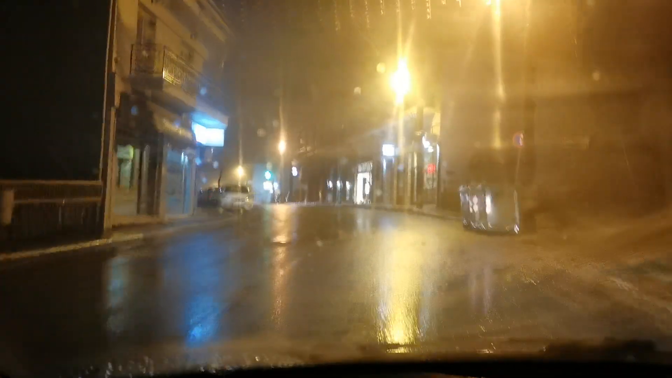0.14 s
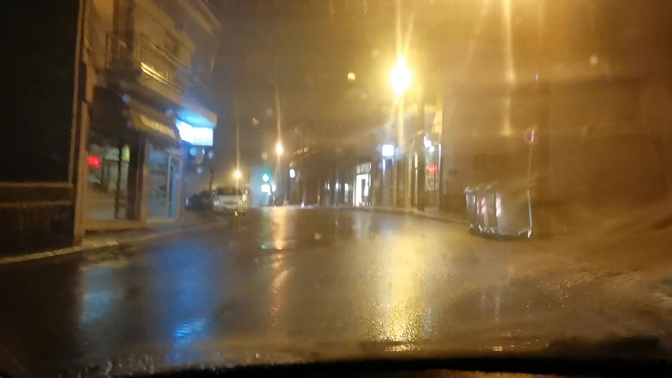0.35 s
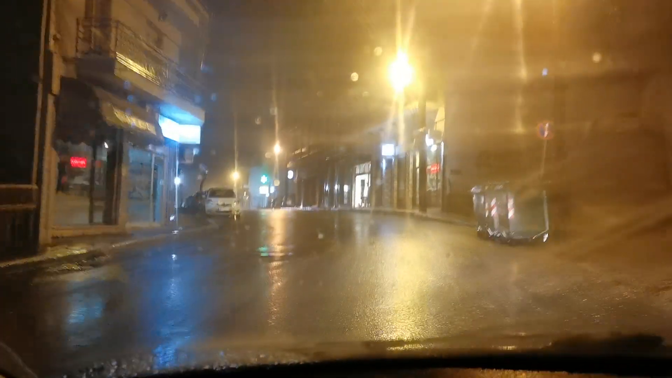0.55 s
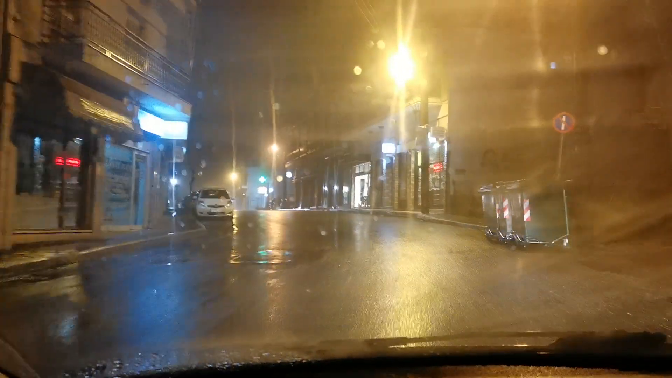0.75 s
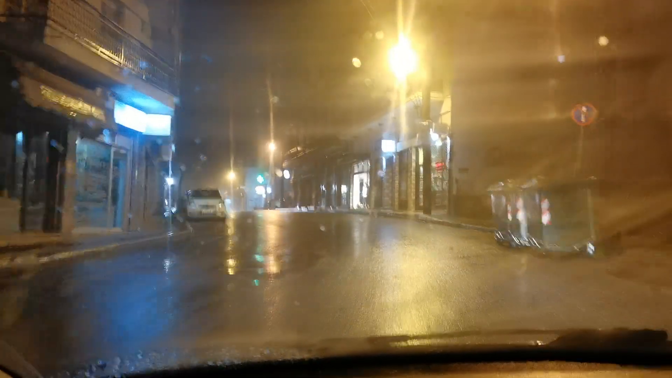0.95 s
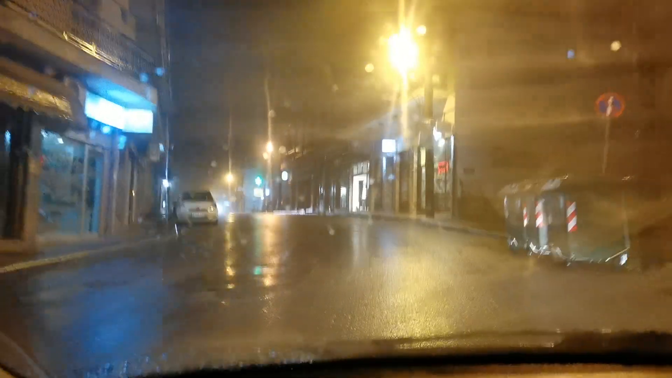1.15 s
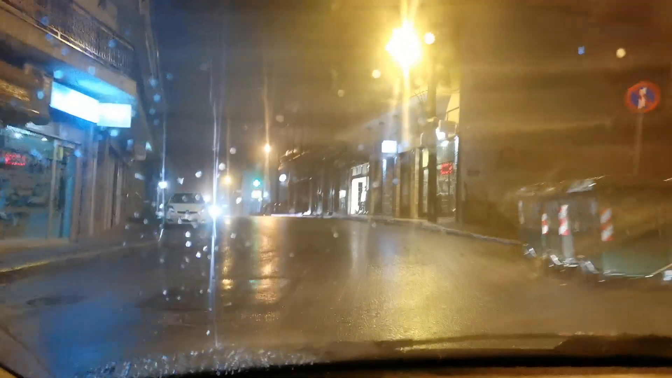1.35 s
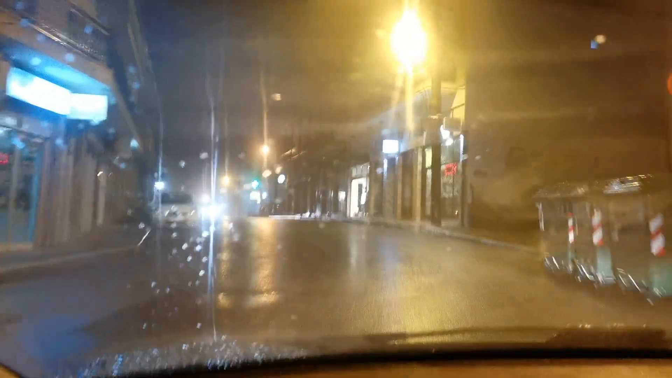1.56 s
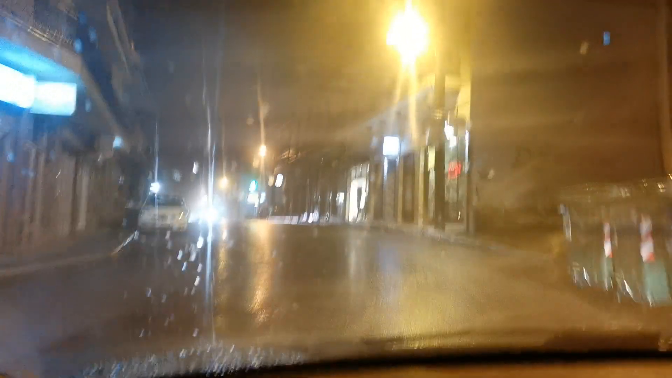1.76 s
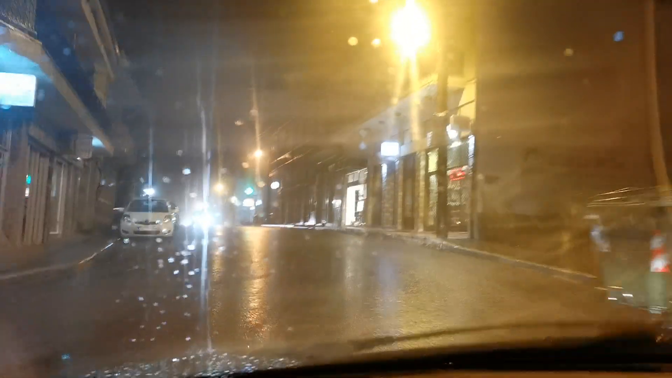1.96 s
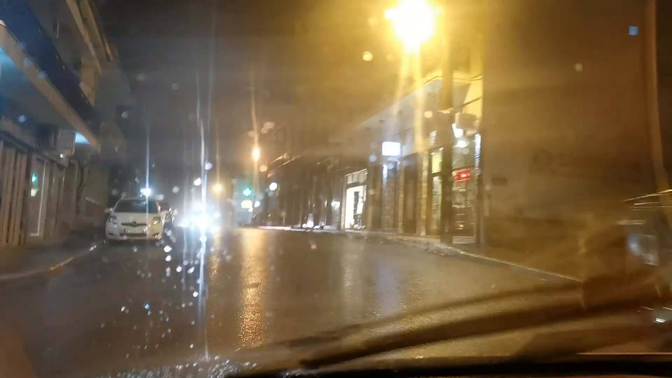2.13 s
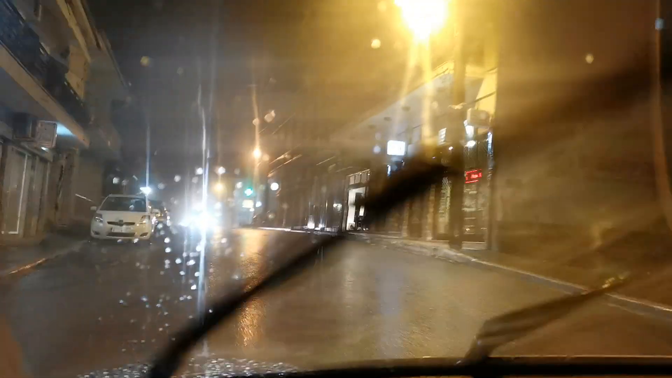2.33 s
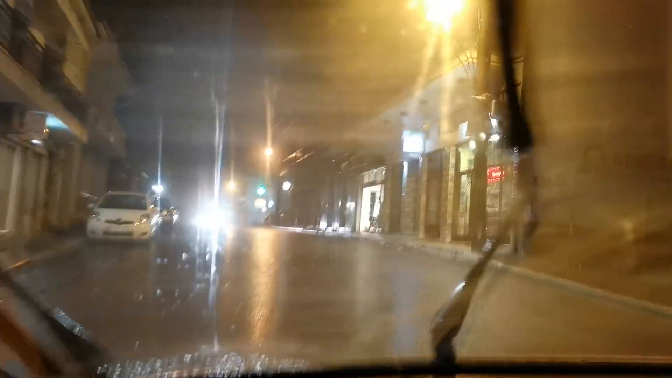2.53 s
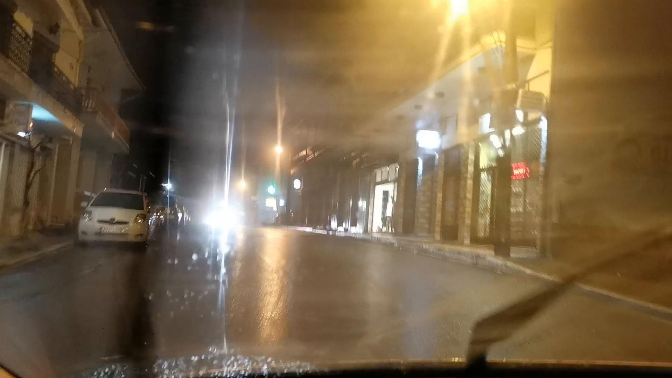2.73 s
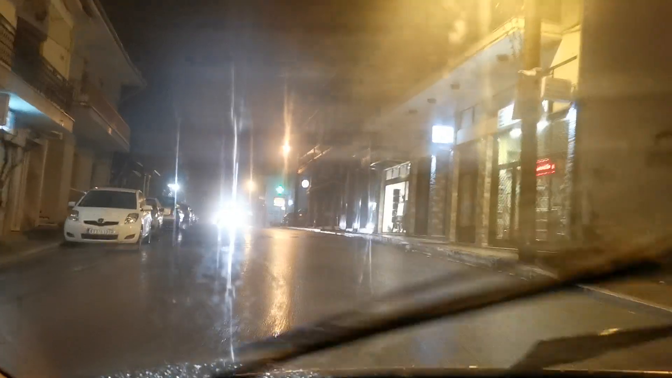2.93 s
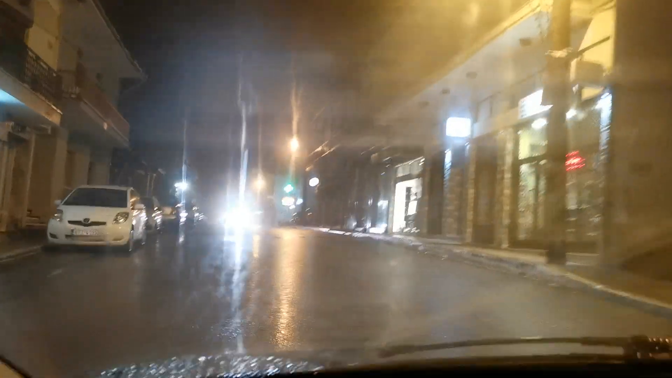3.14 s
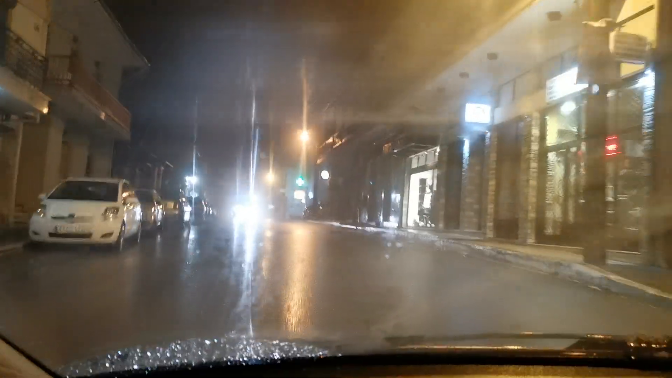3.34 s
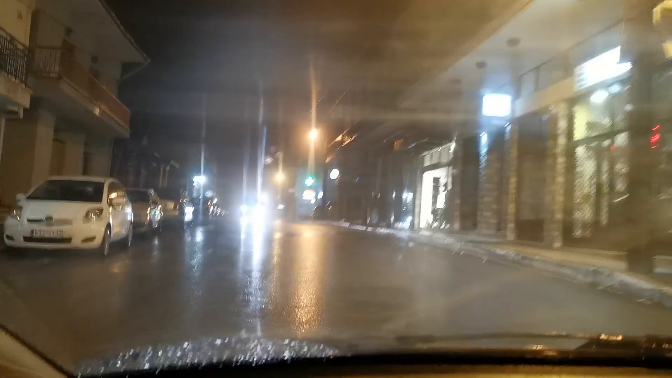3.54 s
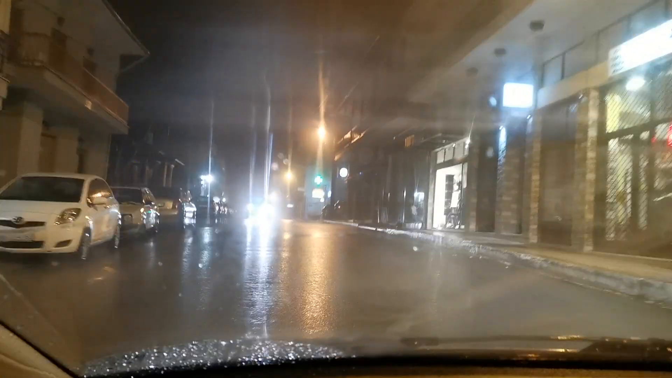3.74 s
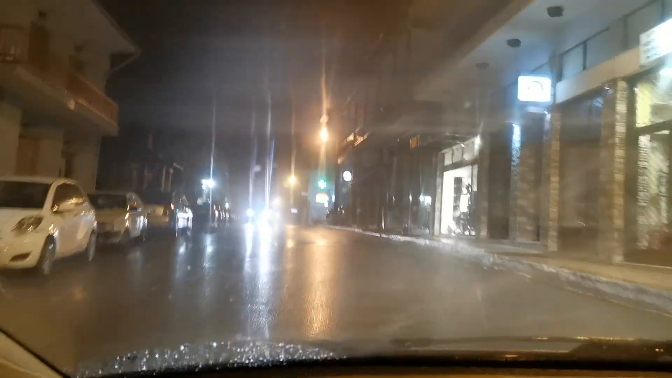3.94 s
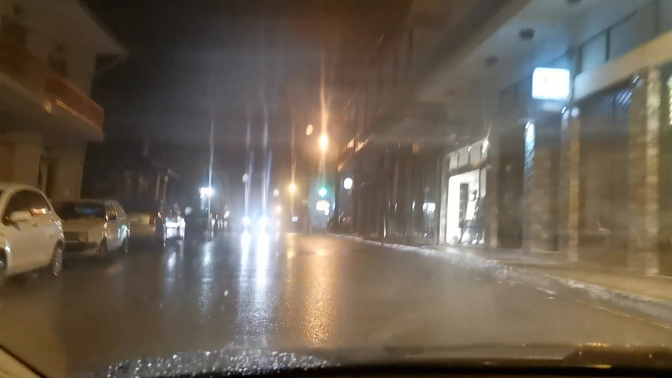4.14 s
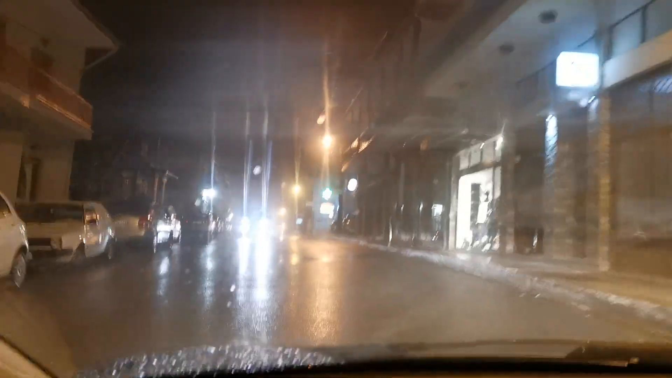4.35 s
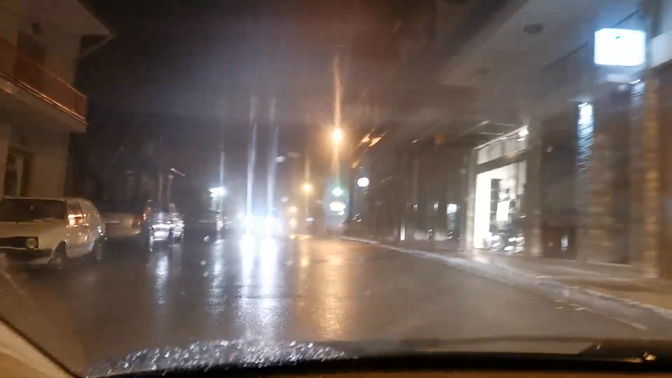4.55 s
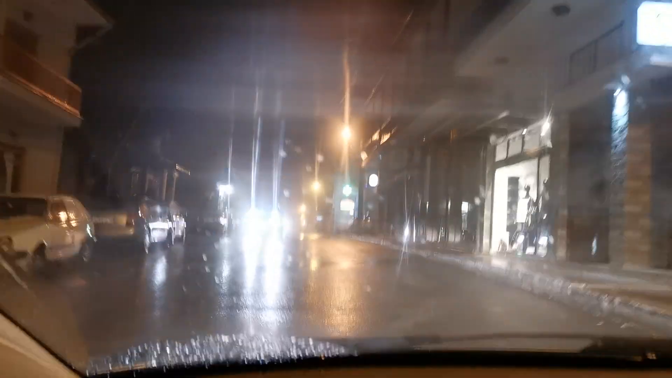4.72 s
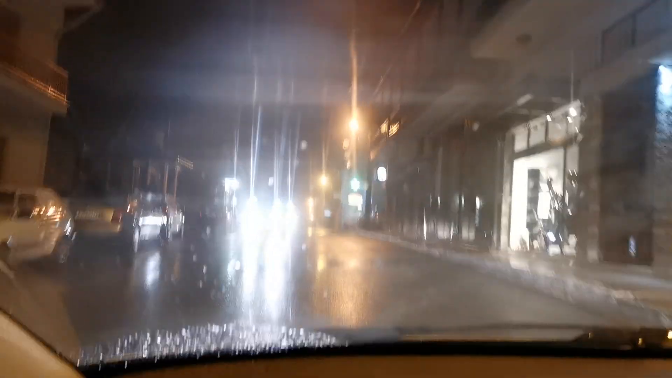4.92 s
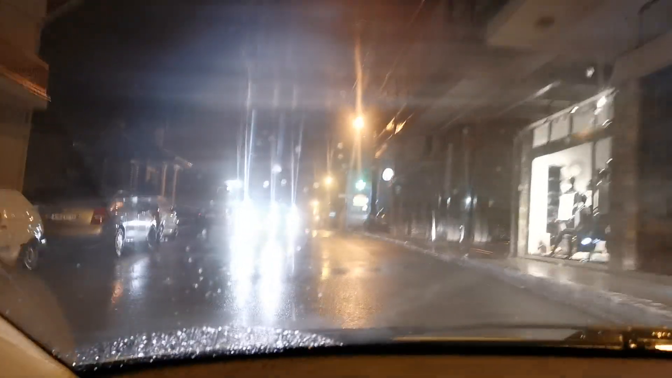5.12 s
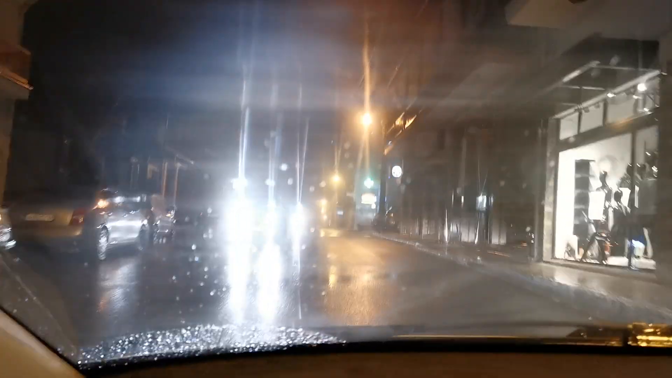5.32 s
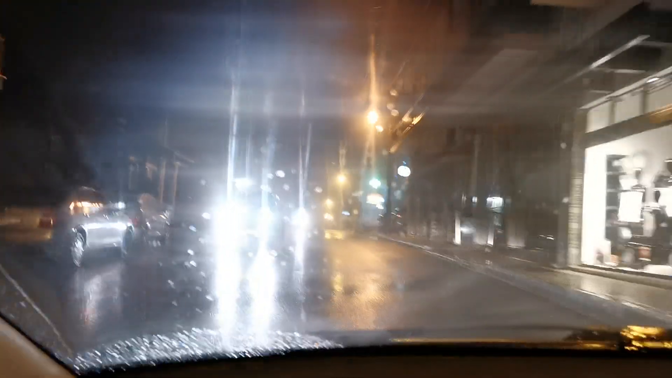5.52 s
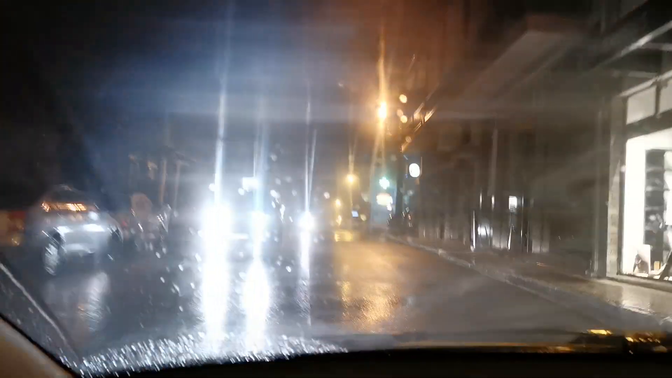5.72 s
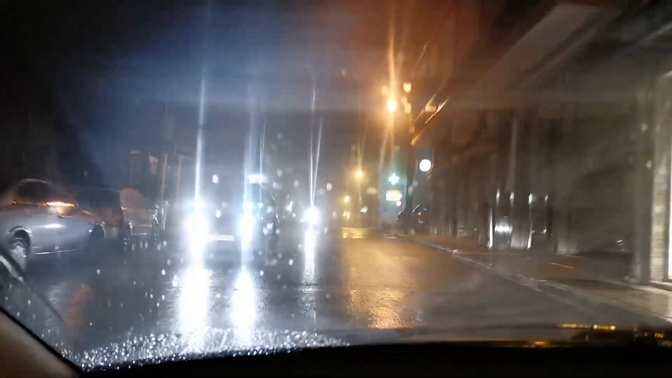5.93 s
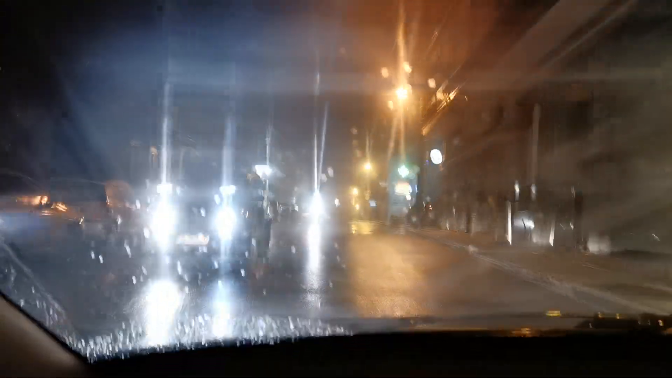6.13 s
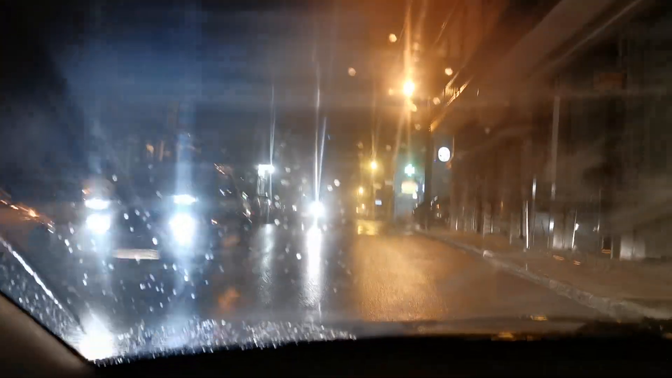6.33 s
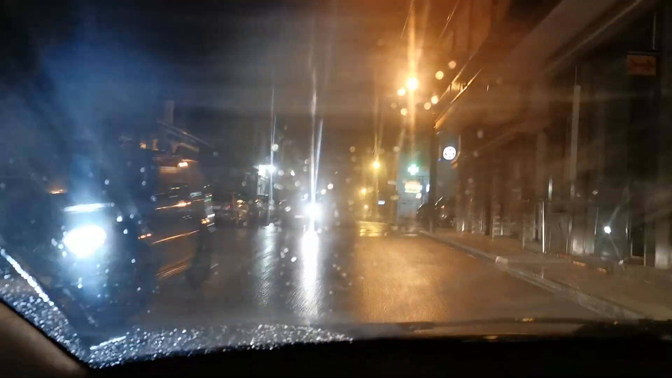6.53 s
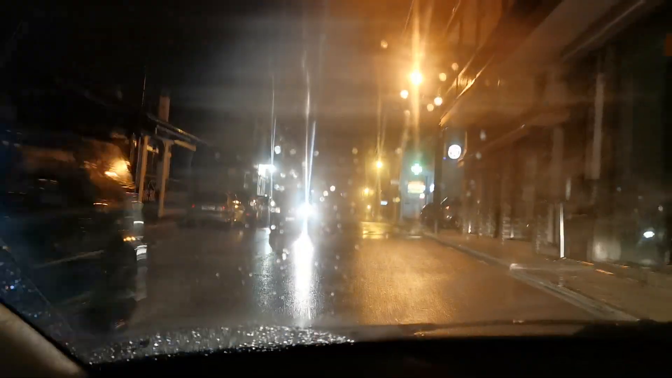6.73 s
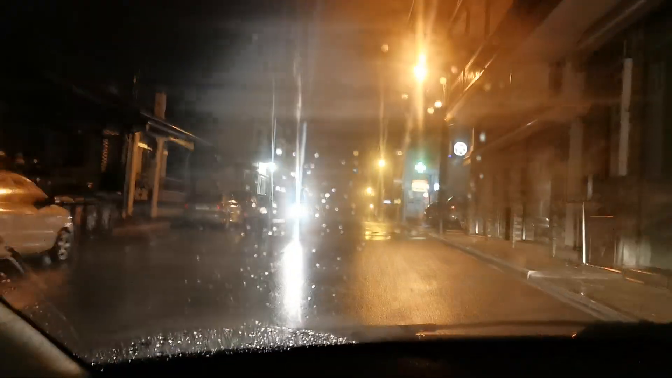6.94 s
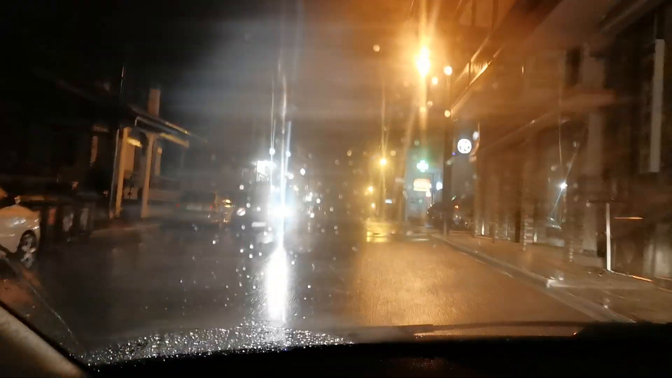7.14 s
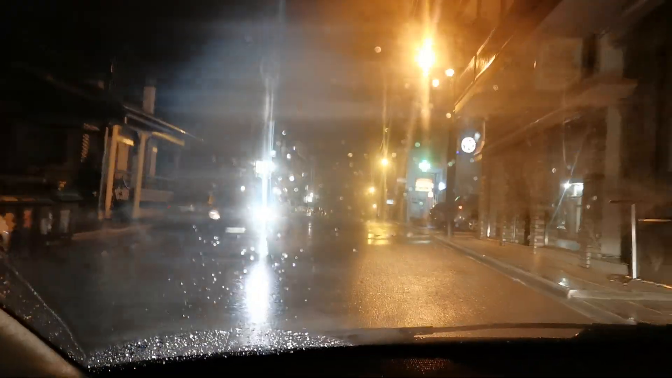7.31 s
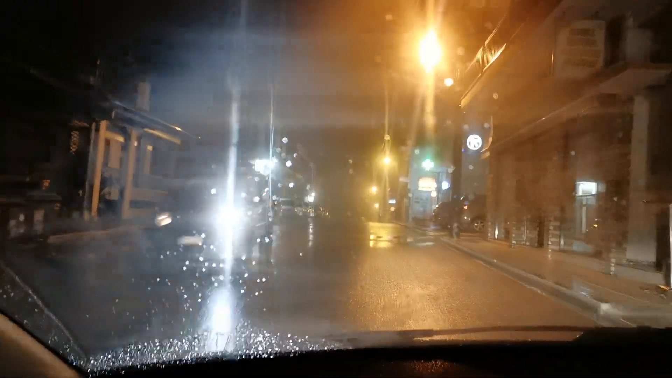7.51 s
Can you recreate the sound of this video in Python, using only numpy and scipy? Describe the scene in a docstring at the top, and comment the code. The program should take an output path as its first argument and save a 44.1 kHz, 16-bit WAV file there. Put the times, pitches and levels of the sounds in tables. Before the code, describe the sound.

Low cabin rumble and engine drone with wet tyre hiss, one harsh rubbery wiper scrape, small plastic clicks, and a splashing car passing near the end.

```python
"""Inside a small car rolling slowly along a wet street at night: the engine drones, then drops to idle.
The road rumbles and booms in the cabin as filtered noise; the engine is a firing tone plus overtones.
Tyres hiss on the water, and an oncoming car sprays past near the end: noise that swells and fades.
The wipers make one sweep: two rubber blades judder loudly up the glass, as stick-slip tones with a
scrape at every slip, then slide back softly and park with a click. A thin squeal comes near the end."""
import sys
import numpy as np
from scipy import signal
from scipy.fft import rfft, irfft
from scipy.io import wavfile
from scipy.ndimage import uniform_filter1d

SR = 44100
rng = np.random.default_rng(int(sys.argv[2]) if len(sys.argv) > 2 else 0)


def materialize(psi):
    """Save the field psi as 16-bit PCM at rate SR to the path in sys.argv[1].

    A 1-D psi becomes a single channel; in a 2-D psi each row is a channel.
    """
    bounded = np.clip(np.atleast_2d(psi).T, -1, 1)
    quanta = np.round(bounded * 32767).astype(np.int16)
    wavfile.write(sys.argv[1], SR, quanta)


N = 338245
TIME = np.arange(N) / SR  # seconds
BINS = np.fft.rfftfreq(N, 1 / SR)  # Hz


def amp(db):
    """Turn decibels into a gain."""
    return 10 ** (np.asarray(db) / 20)


def unit(x):
    """Scale to an rms (average strength) of 1."""
    return x / np.sqrt(np.mean(abs(x) ** 2) + 1e-20)


def read(points, hz):
    """Look up a spectrum's value at hz, on a log-frequency axis."""
    f, value = np.transpose(points)
    return np.interp(np.log(hz + 1), np.log(f + 1), value)


def curves(rows):
    """Join the points of every column of a table with straight lines, sample by sample."""
    s, *columns = np.transpose(rows)
    return [np.interp(TIME, s, column) for column in columns]


def during(rows):
    """A gate with soft edges, open over the time that a table covers."""
    is_open = (TIME > rows[0][0]) & (TIME < rows[-1][0])
    return uniform_filter1d(1. * is_open, size=300)


def swell(s, half_s, db):
    """A smooth rise and fall around time s."""
    return amp(db) * np.exp(-((TIME - s) / half_s) ** 2)


def ramp(s, length):
    """Climb from 0 at time s to 1 after length seconds."""
    return np.clip((TIME - s) / length, 0, 1)


def thud(s, rise_s, db):
    """The level of a quick push that peaks after rise_s and dies away."""
    u = np.maximum(TIME - s, 0) / rise_s
    return amp(db) * u * np.exp(1 - u)


def wander(hz):
    """A slow random curve of rms 1 that varies up to about hz."""
    s = np.arange(0, 8, 1 / 2000)
    f = np.fft.rfftfreq(len(s), s[1])
    slow = irfft(rfft(rng.standard_normal(len(s))) / (1 + (f / hz) ** 4))
    return np.interp(TIME, s, unit(slow))


def colour(x, spectrum):
    """Filter by a spectrum that falls away beyond its last point; white noise keeps its level."""
    fall = np.maximum(BINS / spectrum[-1][0], 1) ** 2
    gain = amp(read(spectrum, BINS)) / fall
    return irfft(rfft(x) * unit(gain), N)


def pair(x, likeness):
    """Mix two unrelated signals into left and right with the given likeness."""
    angle = np.arccos(np.clip(read(likeness, BINS), -1, 1)) / 2
    mid, side = rfft(x) * np.array([np.cos(angle), np.sin(angle)])
    return irfft(np.array([mid + side, mid - side]), N)


# How alike left and right are in the cabin: f/Hz, likeness (1 = the same, 0 = unrelated)
LIKENESS = [(60, 1), (250, .99), (500, 0.98), (1000, 0.96), (2000, 0.71), (3500, 0.52), (6000, -0.026),
            (12000, 0.11)]


def cabin_noise(spectrum, grain_db=0):
    """Noise from all around, reaching the two microphones; grain makes its level spatter."""
    grains = rng.standard_normal((2, N)) * amp(grain_db * wander(400))
    return colour(pair(unit(grains), LIKENESS), spectrum)


def cabin_echo(x, t60):
    """Dense short reflections off glass and trim, different at each microphone; t60 s to fall 60 dB."""
    t = np.arange(SR // 4) / SR
    tail = rng.standard_normal((2, len(t))) * amp(-60 * t / t60) * (t > .001)
    return signal.fftconvolve(x[None], tail / np.linalg.norm(tail[0]), axes=1)[:, :N]


# Road noise before it sways, easing as the car slows: t/s, rumble level/dB, boom level/dB, tread level/dB
ROAD = [(0, -33.5, -44, -43.5), (.45, -35.5, -35, -45), (1.4, -32, -31, -43), (1.65, -34.5, -35.5, -44.5),
        (3.5, -34.5, -39.5, -45), (4.6, -35.5, -37, -41.5), (5.6, -33.5, -36.5, -45), (6.45, -36, -36, -48),
        (7.67, -36.5, -40.5, -49.5)]
# Low swells: dips in the road, and at 2.02 s the wiper linkage starting with a low thump:
# t/s, half length/s, added rumble level/dB, added boom level/dB
LOW_SWELLS = [(0.467, 0.061, 7, -2), (1.81, 0.073, 6.5, 3), (2.02, 0.052, 5, 10.5), (5.978, .08, 4.5, -0.5),
              (6.26, 0.063, 5, 3.5), (7.577, 0.066, 6.5, 3.5)]
# Colours of the body rumble, tyre boom and tread roar: f/Hz, relative level/dB (per Hz)
RUMBLE = [(8, -9), (18, 11.5), (30, 0.5), (41, 13), (50, 5), (70, 0), (88, 1), (105, 0), (160, -54.5)]
BOOM = [(85, -37.5), (112, -6.5), (127, 10), (142, 7), (155, 3), (172, -5), (195, -4), (240, -26.5),
        (330, -47.5)]
TREAD = [(130, -45.5), (220, 8.5), (280, -3), (370, 1.5), (450, -6.5), (560, -3), (720, -8.5),
         (1000, -12.5), (2000, -37.5)]
ROAD_SWELL_DB, ROAD_SWELL_HZ = 1.44, 2.7


def road():
    """Body rumble, tyre boom and tread roar sway with the uneven surface; low swells add to the first two."""
    rumble_db, boom_db, tread_db = curves(ROAD)
    for s, half_s, more_rumble_db, more_boom_db in LOW_SWELLS:
        shape = swell(s, half_s, 0)
        rumble_db = rumble_db + more_rumble_db * shape
        boom_db = boom_db + more_boom_db * shape
    out = np.zeros((2, N))
    for db, tone in [(rumble_db, RUMBLE), (boom_db, BOOM), (tread_db, TREAD)]:
        level = amp(db + ROAD_SWELL_DB * wander(ROAD_SWELL_HZ))
        out += level * cabin_noise(tone)
    return out


# The engine slows gently, then falls to idle as the clutch opens: t/s, firing f/Hz (before it wavers)
FIRING = [(0, 70.2), (1.3, 67.9), (2, 66.2), (2.8, 63.6), (3.5, 62.6), (5.6, 62), (5.77, 61), (6, 53),
          (6.25, 41), (7.35, 29)]
# Engine load: t/s, firing tone level/dB, overtones level/dB (before they waver)
LOAD = [(0, -40, -38.5), (.9, -34, -37.5), (1.8, -35, -37), (3, -32, -38), (5.5, -32.5, -41),
        (5.85, -34, -50.5), (6.2, -38, -58), (6.6, -58, -51), (7.3, -38, -60)]
# How the car body passes on the engine's overtones: f/Hz, level/dB
ENGINE_BODY = [(110, -18), (135, -1), (155, -11), (175, -12), (190, -9), (235, -22), (260, -3.5),
               (282, -20), (310, -22), (355, -14.5), (385, -20.5), (412, -15.5), (460, -33), (560, -26.5)]
# Before the fall to idle the drivetrain shunts, rocking the firing rate
SHUNT_FROM_S, SHUNT_TO_S, SHUNTS_PER_S, SHUNT_DEPTH_HZ = 4.055, 5.69, 3.06, 1.8


def engine():
    """Four firings a cycle make a strong tone; the cycle's multiples slide through body resonances."""
    shunting = (TIME > SHUNT_FROM_S) & (TIME < SHUNT_TO_S)
    rocking = shunting * np.sin(2 * np.pi * SHUNTS_PER_S * (TIME - SHUNT_FROM_S))
    firing_hz = curves(FIRING)[0] - SHUNT_DEPTH_HZ * rocking
    tone_db, overtones_db = curves(LOAD)
    cycle_hz = firing_hz * (1 + .0015 * wander(6)) / 4
    cycle = np.cumsum(cycle_hz) / SR
    tone = np.sin(2 * np.pi * 4 * cycle)
    overtones = np.zeros(N)
    for k in range(6, 34):
        waver_db = 2.6 * wander(4)
        level = amp(read(ENGINE_BODY, k * cycle_hz) + waver_db)
        overtones += level * np.sin(2 * np.pi * (k * cycle + rng.random()))
    tone_level = amp(tone_db + 1.8 * wander(10))
    return np.sqrt(2) * (tone_level * tone + amp(overtones_db) * overtones)


# Wheels bump over seams in the road: t/s, level/dB
BUMPS = [(3.31, -43), (3.79, -55), (4.11, -52), (4.31, -40.5)]
# Colour of a bump, also used when the wiper blades break loose: f/Hz, relative level/dB (per Hz)
BUMP_TONE = [(60, 1), (200, 0), (450, -1), (750, 0), (1150, -8), (1700, -17), (5000, -62)]


def bumps():
    """Dull thuds that come up through the suspension, as short pushes of low noise."""
    return sum(thud(s, 0.015, db) for s, db in BUMPS) * cabin_noise(BUMP_TONE)


def resonances(modes):
    """Narrow resonances, each stirred by its own uneven churning."""
    out = 0
    for hz, width, db in modes:
        response = 1 / (1 + 2j * (BINS - hz) / width) ** 2
        ring = irfft(rfft(rng.standard_normal(N)) * response, N)
        out += amp(db + 3.3 * wander(14)) * unit(ring)
    return unit(out)


# Swells of water noise: wet stretches of road, and near 3.1 s the wipers' return swish:
# t/s (middle), half length/s, swish level/dB, sizzle level/dB, spray level/dB
WATER_SWELLS = [(.04, 0.24, -48.5, -53, -49.5), (0.777, 0.66, -47.5, -63, -49.5),
                (0.772, 0.24, -49.5, -66, -48.5), (3.105, 0.67, -52.5, -62, -54),
                (4.127, 0.33, -52.5, -55.5, -55), (4.657, 0.22, -49, -52.5, -57.5),
                (5.394, 1, -56, -54, -59)]
# Brief spurts of water: t/s, level/dB, half length/s
SPURTS = [(0.103, -49, 0.016), (.6, -49, .02), (.83, -52, .04), (2.775, -51.5, 0.032), (3.505, -49, 0.039),
          (3.656, -55.5, 0.042), (3.88, -56, .05), (5.92, -55, .025), (6.254, -55.5, 0.019)]
# Colours of the swish, a thin film's sizzle, the spray and a spurt: f/Hz, relative level/dB (per Hz)
SWISH = [(300, 2), (560, 1.5), (640, -7.5), (750, 2.5), (1090, -0.5), (1180, 4.5), (1280, -0.5),
         (1420, 2.5), (1800, 0), (2400, 0.5), (2900, 0.5), (3600, -4.5), (5000, -9.5), (8000, -39.5)]
SIZZLE = [(1200, -24), (2400, -3.5), (3100, -1.5), (3900, -3), (5500, -9.5), (8000, -35)]
SPRAY = [(2000, -20.5), (3500, -1.5), (4300, -1.5), (5200, 1.5), (5800, 1), (6400, -6), (7000, -2.5),
         (7850, -1.5), (8300, -11.5), (9200, -18), (10200, -27), (15000, -38)]
SPURT_TONE = [(3500, -21), (5500, 5), (7800, 3), (9000, -8), (11000, -22), (14500, -23)]
# Resonances of the puddle's gurgle: f/Hz, width/Hz, relative level/dB (before it wavers)
GURGLE = [(840, 93, 0), (1177, 46, -3), (1410, 90, 0), (1550, 120, 0.5), (1995, 85, -0.5)]
# Steady hiss of the tyres on the wet road
SWISH_DB, SPRAY_DB = -51, -59
# The oncoming car: when it is closest, seconds it takes to cover its closest distance, levels it adds then
PASS_S, PASS_WIDTH_S, PASS_SWISH_DB, PASS_SPRAY_DB = 7.37, 0.31, -39.5, -44.5
# It runs through a puddle as it passes
PUDDLE_S, PUDDLE_HALF_S, PUDDLE_DB = 7.31, 0.14, -41


def water():
    """Water swishes, sizzles and sprays, more in its swells and as a car passes; a puddle gurgles."""
    # power falls with the square of the other car's distance
    nearness = 1 / (1 + ((TIME - PASS_S) / PASS_WIDTH_S) ** 2)
    swish_power = amp(SWISH_DB) ** 2 + nearness * amp(PASS_SWISH_DB) ** 2
    spray_power = amp(SPRAY_DB) ** 2 + nearness * amp(PASS_SPRAY_DB) ** 2
    sizzle_power = np.zeros(N)
    for s, half_s, swish_db, sizzle_db, spray_db in WATER_SWELLS:
        swish_power += swell(s, half_s, swish_db) ** 2
        sizzle_power += swell(s, half_s, sizzle_db) ** 2
        spray_power += swell(s, half_s, spray_db) ** 2
    swish = np.sqrt(swish_power) * amp(0.5 * wander(22)) * cabin_noise(SWISH, grain_db=-0.2)
    sizzle = np.sqrt(sizzle_power) * amp(1.1 * wander(18)) * cabin_noise(SIZZLE, grain_db=0.7)
    spray = np.sqrt(spray_power) * amp(1.0 * wander(18)) * cabin_noise(SPRAY, grain_db=1.0)
    spurts = sum(swell(s, half_s, db) for s, db, half_s in SPURTS) * cabin_noise(SPURT_TONE)
    puddle = swell(PUDDLE_S, PUDDLE_HALF_S, PUDDLE_DB) * resonances(GURGLE)
    return swish + sizzle + spray + spurts + puddle


# A faint squeal comes and goes, probably a brake: t/s, level/dB, half length/s
SQUEALS = [(7.172, -43, 0.017), (7.235, -39.5, 0.022), (7.385, -42, .016)]
SQUEAL_HZ, SQUEAL_WAVER = 1210, .007  # the waver is a share of the pitch


def squeal():
    """One thin, slightly wavering tone that catches and lets go."""
    turns = np.cumsum(SQUEAL_HZ * (1 + SQUEAL_WAVER * wander(40))) / SR
    level = sum(swell(s, half_s, db) for s, db, half_s in SQUEALS)
    return level * np.sqrt(2) * np.sin(2 * np.pi * turns)


# Clicks of small plastic parts: t/s, level/dB, rebound after/s, crack relative level/dB, then four ringing #
# tones, each f/Hz, relative level/dB
CLICKS = [(3.266, -35.5, 0.0061, -7, 1310, -5, 2100, -6, 3090, -14, 3620, 1),
          (3.36, -28, 0.0031, 0.5, 1604, 1.5, 2250, -1, 2760, -0.5, 7840, 0.74),
          (5.0025, -30.5, 0.0025, -2.5, 1310, -9, 1640, -4, 1920, 1, 2560, 1)]
# Colour of the crack: f/Hz, relative level/dB (per Hz)
CRACK = [(300, 9), (1000, 0.5), (2200, 4), (3200, 0.5), (5000, -1), (6800, -3.5), (8000, -11), (9300, -20),
         (11000, -40), (15000, -42)]


def clicks():
    """Small parts knock together, crack, rebound once and ring briefly."""
    out = np.zeros((2, N))
    for s, db, rebound, crack_db, *rings in CLICKS:
        t = np.maximum(TIME - s, 0)
        first_contact = (t > 0) * amp(-60 * t / 0.057)
        second_contact = .5 * (t > rebound) * amp(-60 * abs(t - rebound) / 0.051)
        push = t / 0.00014
        knock = 6 * push * np.exp(-push)
        crack = amp(crack_db) * (knock + (first_contact + second_contact) * cabin_noise(CRACK))
        # the ring builds up at once, holds until the rebound, then dies
        ring_level = (1 - np.exp(-t / 0.00051)) * amp(-60 * np.maximum(t - rebound, 0) / 0.022)
        tones = np.zeros(N)
        for hz, ring_db in zip(rings[::2], rings[1::2]):
            tones += amp(ring_db) * np.sin(2 * np.pi * (hz * t + rng.random()))
        ring = ring_level * tones
        out += amp(db) * (crack + ring + amp(-7.0) * cabin_echo(ring, t60=.1))
    return out


# Overtones of a blade as the windscreen passes them on: f/Hz, level/dB
BLADE_TONE = [(130, 3), (250, -3.5), (340, 1.5), (400, 1.5), (460, -8), (550, -1), (650, -7), (850, -7),
              (1000, -11.5), (1150, -9), (1500, -23), (2000, -23.5), (2600, -17), (3500, -40)]


def blade(rows, dull_db):
    """A rubber lip sticks and slips unevenly; returns its groan and the bursts of its slips."""
    hz, level_db, rough = curves(rows)
    turns = np.cumsum(hz * (1 + .14 * rough * wander(140))) / SR
    level = amp(level_db + 3.7 * rough * wander(70)) * during(rows)
    # the slips sharpen as the blade gathers speed: overtones lose fewer dB per octave
    slope_db = dull_db + np.interp(TIME - rows[0][0], [0, .09], [4.5, 0])
    groan = np.zeros(N)
    for k in np.arange(1, 11):
        # the lip grips differently along its length, so the higher overtones flutter more
        flutter_db = (1.6 + .2 * k) * wander(35)
        overtone = amp(read(BLADE_TONE, k * hz) - slope_db * np.log2(k) + flutter_db)
        groan += overtone * np.cos(2 * np.pi * (k * turns + rng.random()))
    slips = np.exp(-(turns % 1) / 0.71)
    return level * groan, level * slips


# A blade judders lightly on the way back: t/s, slips f/Hz, level/dB, roughness (0-1)
RETURN_BLADE = [(2.92, 170, -42, .4), (2.945, 180, -32, 0.37), (3.01, 262, -30.5, 0.32),
                (3.06, 320, -45, 0.37), (3.1, 360, -38, 0), (3.13, 360, -59, .3)]
# Colours of the rubber's murmur and of the slide through water: f/Hz, relative level/dB (per Hz)
RETURN_TONE = [(130, -26), (200, 5), (280, 4), (380, -4), (520, -8.5), (750, -21), (1100, -43), (2000, -51)]
RETURN_SWISH = [(1200, -27), (2100, -5.5), (2700, 1), (3100, -4.5), (3800, -15), (6000, -37)]
# The blades flip over, murmur at full speed, then swish down through the water
FLIP_S, FLIP_HALF_S, FLIP_DB = 2.7, 0.06, -32
MURMUR_S, MURMUR_HALF_S, MURMUR_DB = 2.995, 0.076, -29.5
SLIDE_S, SLIDE_HALF_S, SLIDE_DB = 3.17, 0.21, -48.5


def wipers_return():
    """The blades flip over and slide back on the wiped glass with a soft, rising judder."""
    flip = swell(FLIP_S, FLIP_HALF_S, FLIP_DB)
    murmur = swell(MURMUR_S, MURMUR_HALF_S, MURMUR_DB)
    rubber = (flip + murmur) * cabin_noise(RETURN_TONE)
    slide = swell(SLIDE_S, SLIDE_HALF_S, SLIDE_DB) * cabin_noise(RETURN_SWISH)
    groan = blade(RETURN_BLADE, dull_db=7.5)[0]
    return groan + rubber + slide


# The upstroke: the blades start, bite harder near the top, and stop
STROKE_START_S, BITE_S, BITE_RISE_S, STROKE_STOP_S = 2.057, 2.455, 0.089, 2.659


def stroke(level_db, bite_db, lag_s, attack_s, release_s):
    """Level of one part of the scrape: it builds, holds, steps up at the bite and dies at the stop."""
    release_db = -60 * np.maximum(TIME - STROKE_STOP_S, 0) / release_s
    level = amp(level_db + bite_db * ramp(BITE_S, BITE_RISE_S) + release_db)
    return ramp(STROKE_START_S + lag_s, attack_s) * level


# Stick-slip of each blade: t/s, slips f/Hz, level/dB, roughness (0-1)
LONG_BLADE = [(2.058, 205, -19.5, .4), (2.135, 288, -17, .25), (2.215, 265, -12.5, 0.23),
              (2.255, 282, -20.5, .25), (2.345, 280, -18, .25), (2.415, 349, -16, .3),
              (2.545, 358, -17, .35), (2.65, 245, -15, .7), (2.68, 228, -35, .5)]
SHORT_BLADE = [(2.058, 135.9, -30.5, .3), (2.078, 135.7, -15, 0.4), (2.14, 185.6, -25.5, .6),
               (2.2, 232, -16, .65), (2.31, 234.5, -22.5, .5), (2.425, 315.1, -21.5, 0.443),
               (2.49, 237.8, -11.5, .35), (2.62, 197.1, -12.5, .4), (2.695, 173.7, -26, 0.31)]
# Colours of the scrape's body and rasp: f/Hz, relative level/dB (per Hz)
SCRAPE_BODY = [(90, -36), (180, 7.5), (400, 12), (600, 6.5), (800, 3), (1100, -6), (1500, -28), (2500, -61)]
SCRAPE_RASP = [(700, -8.5), (1200, 1.5), (1500, 1), (1900, -2), (2300, -0.5), (2800, -3.5), (3400, -10.5),
               (4200, -18.5), (5500, -31), (8000, -82)]
# The blades break loose with a thump, and rasp for a moment as they bite
GRAB_RISE_S, GRAB_DB = 0.021, -27.5
SURGE_S, SURGE_HALF_S, SURGE_DB = 2.48, .02, -30


def wipers():
    """Both blades break loose and judder up the windscreen, scraping at every slip."""
    groan, slips = np.add(blade(LONG_BLADE, dull_db=2.3), blade(SHORT_BLADE, dull_db=3.5))
    # even out the slips' loudness, keeping only their pulsing
    slip_loudness = np.sqrt(abs(uniform_filter1d(slips ** 2, size=500)) + 1e-8)
    bursts = 0.45 + slips / slip_loudness
    likeness = [(300, 1.0), (1000, 0.85), (2500, 0.82), (5000, .3)]
    grit = pair(rng.standard_normal((2, N)), likeness)
    # each slip partly repeats the one before, which bands the scrape at the judder's pitch
    slip_hz = curves(LONG_BLADE)[0]
    previous = np.array([np.interp(TIME - 1 / slip_hz, TIME, side) for side in grit])
    grit = unit(grit + .65 * previous) * bursts * amp(.9 * wander(60))

    body_level = stroke(level_db=-30.5, bite_db=8, lag_s=0, attack_s=0.011, release_s=0.2)
    rasp_level = stroke(level_db=-31.5, bite_db=3.0, lag_s=0.018, attack_s=0.057, release_s=0.068)
    fizz_level = stroke(level_db=-58.0, bite_db=12, lag_s=0.036, attack_s=.025, release_s=.08)
    surge = swell(SURGE_S, SURGE_HALF_S, SURGE_DB)
    body = body_level * colour(grit, SCRAPE_BODY)
    rasp = (rasp_level + surge) * colour(grit, SCRAPE_RASP)
    fizz = fizz_level * colour(grit, SPRAY)
    grab = thud(STROKE_START_S, GRAB_RISE_S, GRAB_DB) * cabin_noise(BUMP_TONE)
    echo = amp(-22.5) * cabin_echo(groan, t60=0.078)
    return grab + groan + echo + body + rasp + fizz


def scene():
    """Everything as heard from behind the windscreen."""
    surroundings = road() + engine() + bumps() + water() + squeal()
    return surroundings + clicks() + wipers_return() + wipers()


# The microphone ports colour the treble differently: f/Hz, level/dB
LEFT_PORT = [(1500, 0), (3000, -2), (5000, -4.5), (6300, 0.5), (7200, 2.5), (7900, 2), (9300, 1.5),
             (11000, 2)]
RIGHT_PORT = [(1500, 0), (3000, 0.5), (5000, -0.5), (6300, 2), (7200, -6.5), (7900, -13), (9300, -8.5),
              (11000, -2)]
EDGE_HZ = 15100


def record(dry):
    """Each microphone port colours its side, then a low-pass filter removes the top of the treble."""
    ports = amp([read(LEFT_PORT, BINS), read(RIGHT_PORT, BINS)])
    heard = irfft(rfft(dry) * ports, N)
    low_pass = signal.firwin(511, EDGE_HZ, window=("kaiser", 9), fs=SR)
    return signal.oaconvolve(heard, low_pass[None], "same")


dry = scene()
out = record(dry)
materialize(out)
```